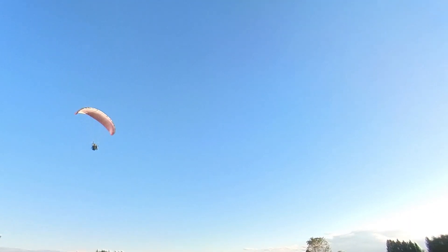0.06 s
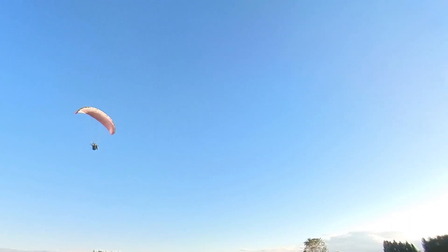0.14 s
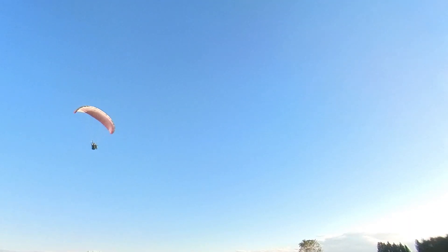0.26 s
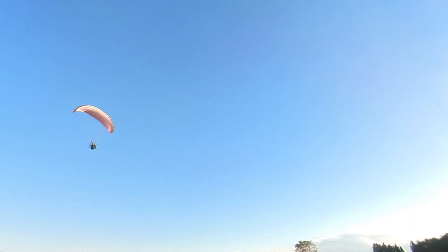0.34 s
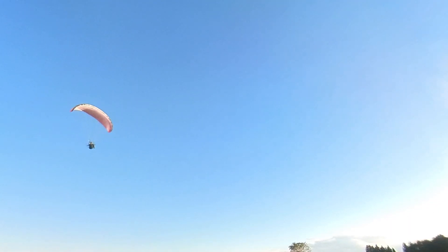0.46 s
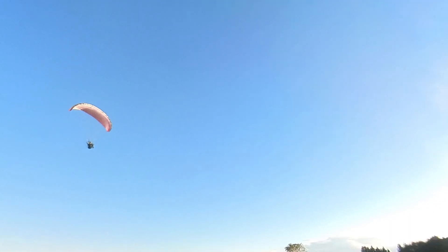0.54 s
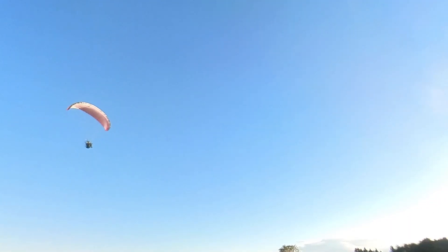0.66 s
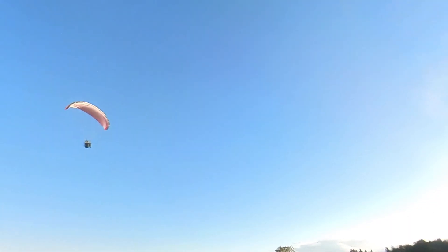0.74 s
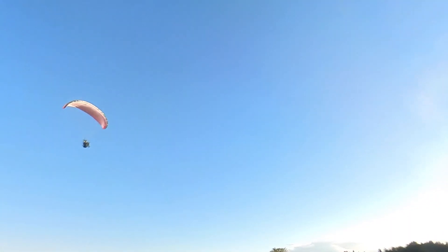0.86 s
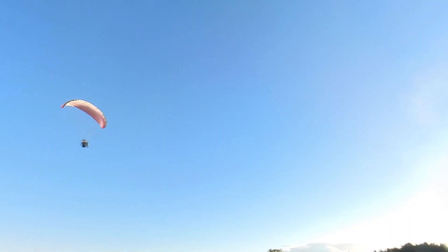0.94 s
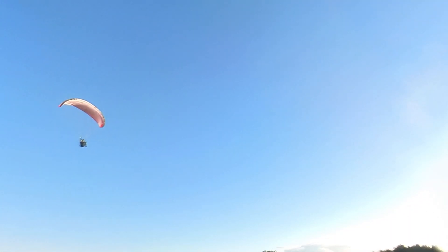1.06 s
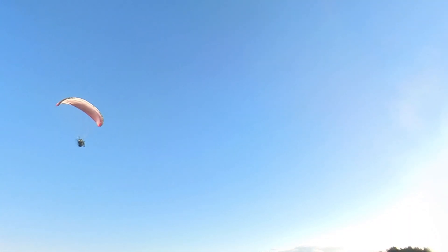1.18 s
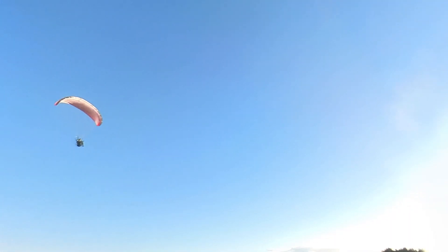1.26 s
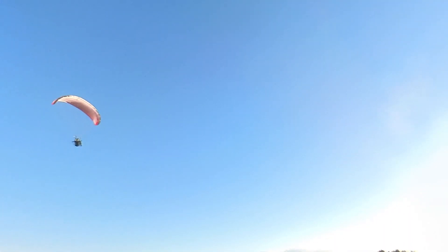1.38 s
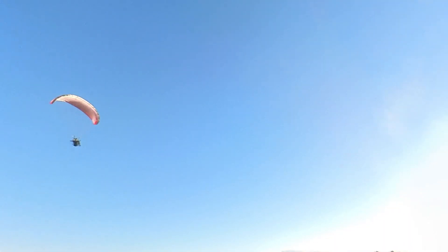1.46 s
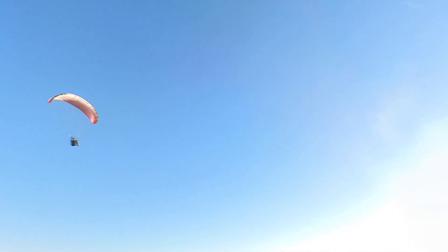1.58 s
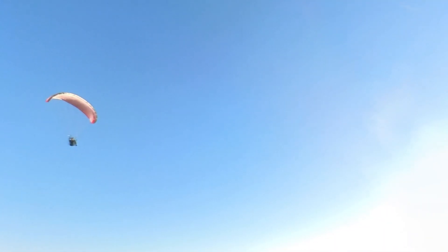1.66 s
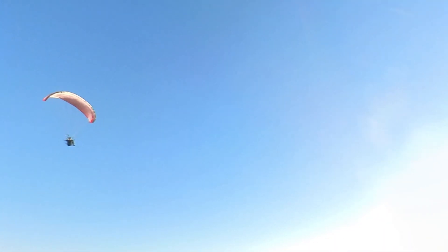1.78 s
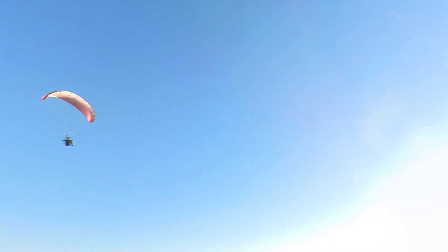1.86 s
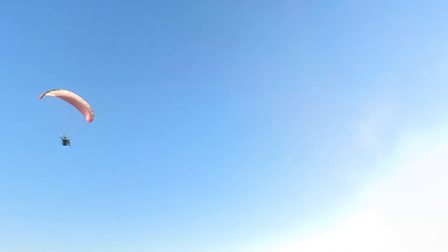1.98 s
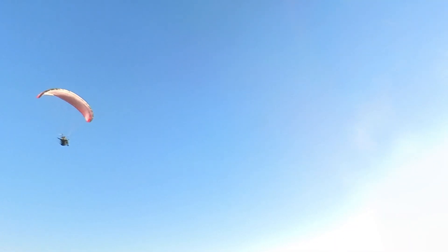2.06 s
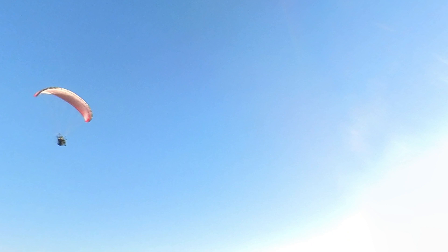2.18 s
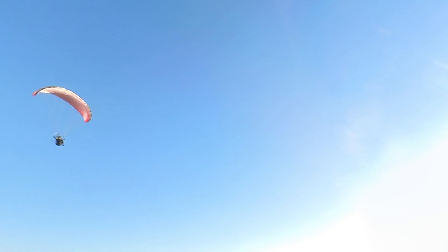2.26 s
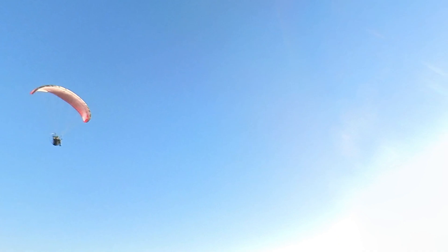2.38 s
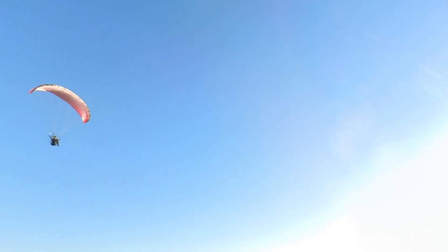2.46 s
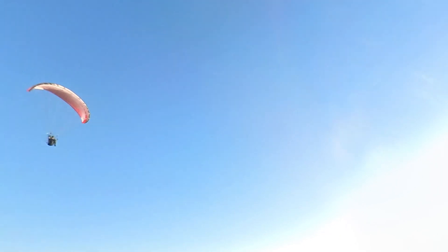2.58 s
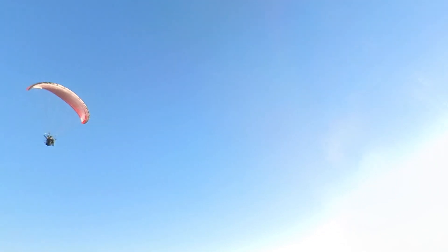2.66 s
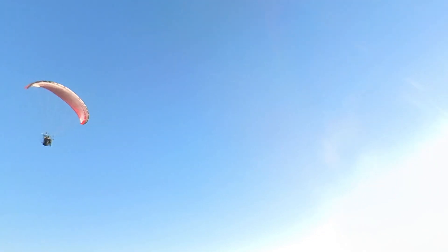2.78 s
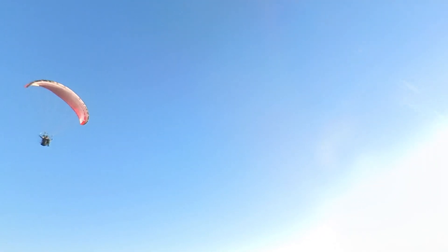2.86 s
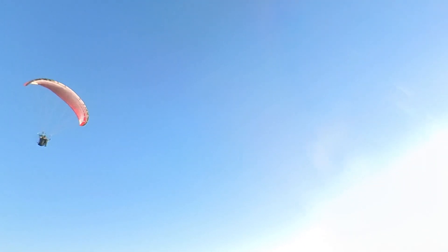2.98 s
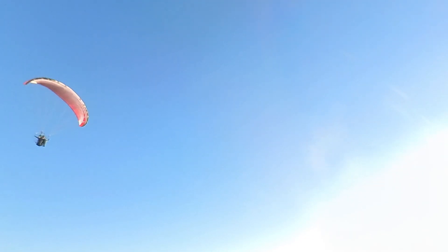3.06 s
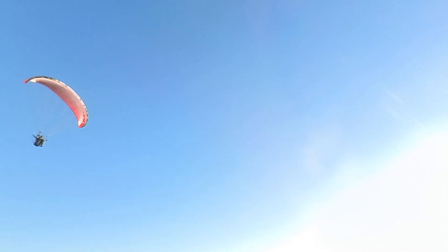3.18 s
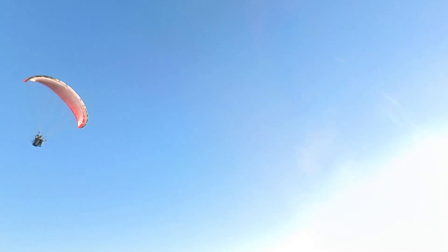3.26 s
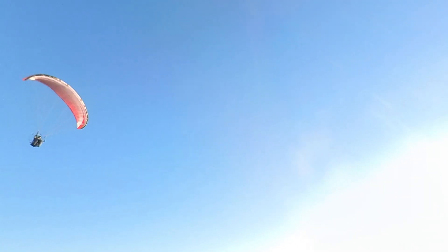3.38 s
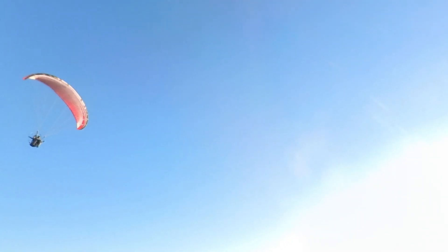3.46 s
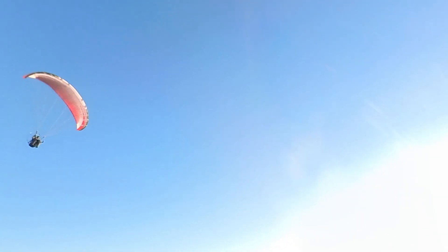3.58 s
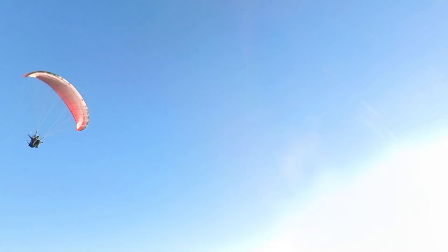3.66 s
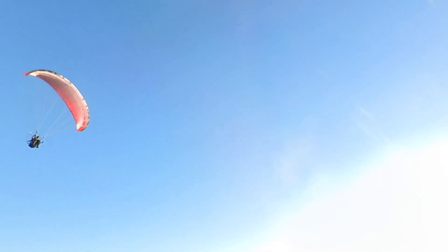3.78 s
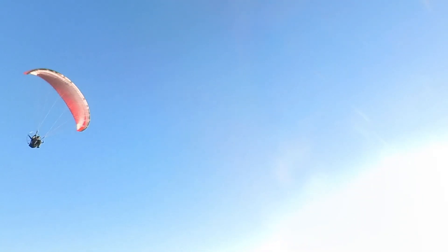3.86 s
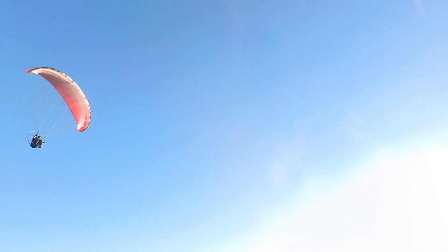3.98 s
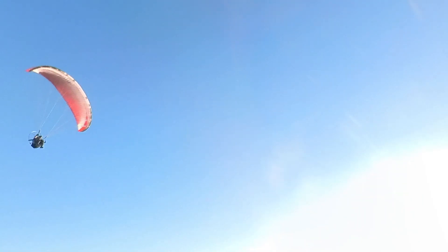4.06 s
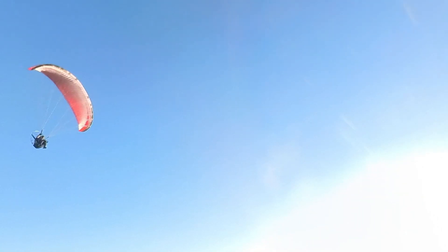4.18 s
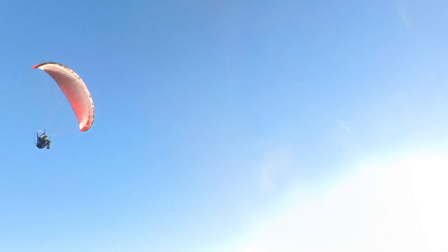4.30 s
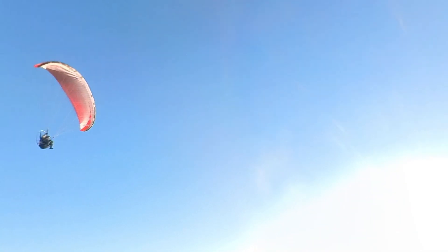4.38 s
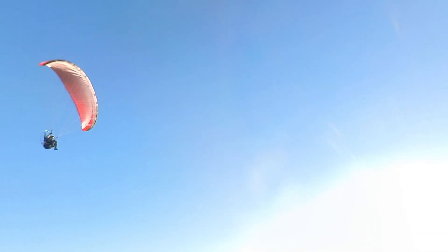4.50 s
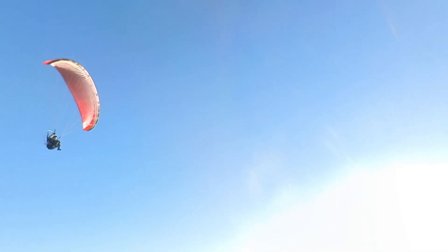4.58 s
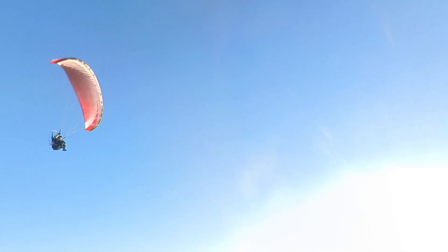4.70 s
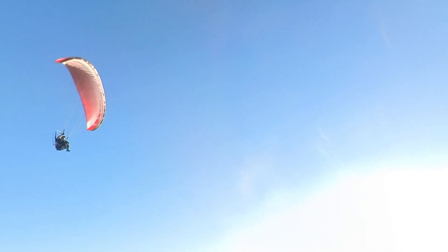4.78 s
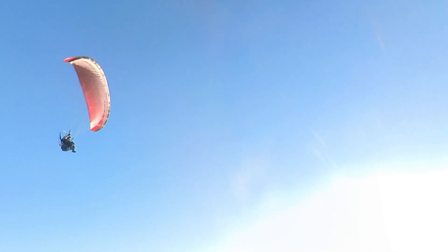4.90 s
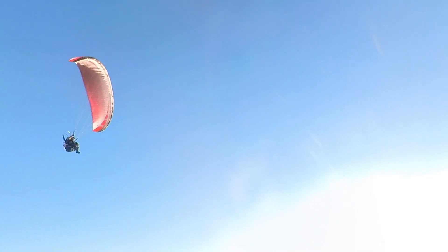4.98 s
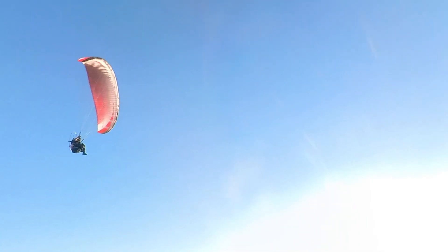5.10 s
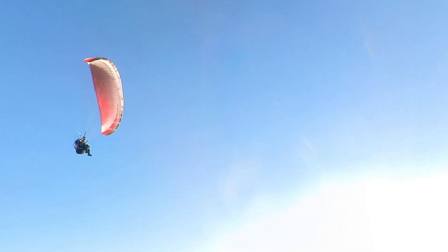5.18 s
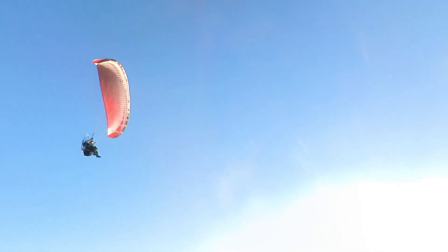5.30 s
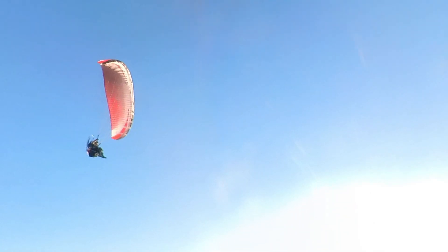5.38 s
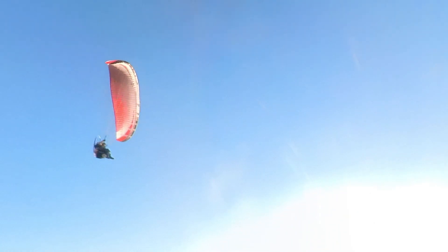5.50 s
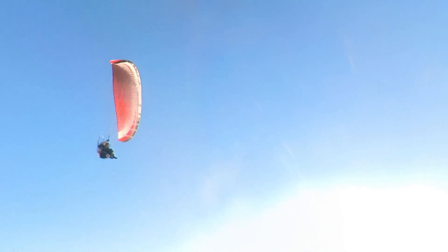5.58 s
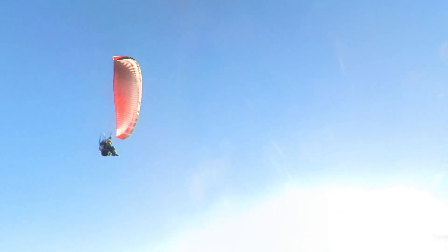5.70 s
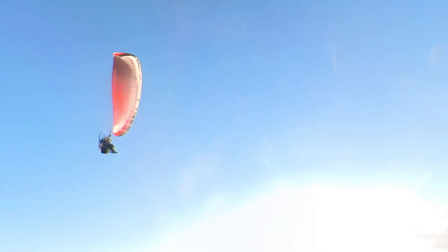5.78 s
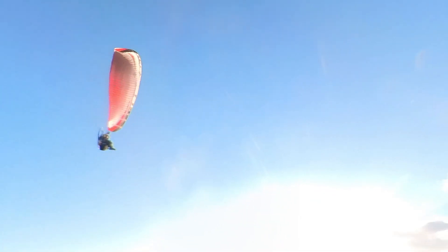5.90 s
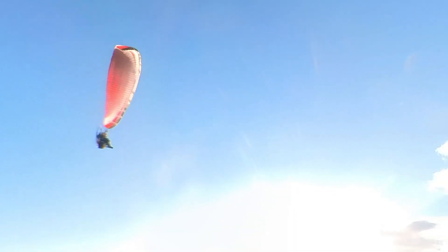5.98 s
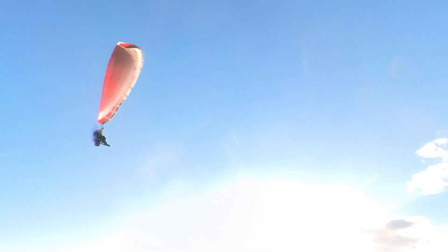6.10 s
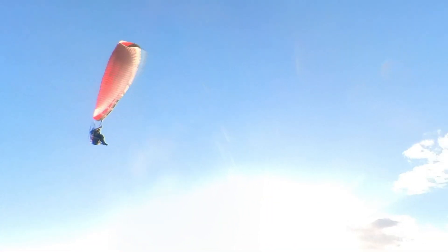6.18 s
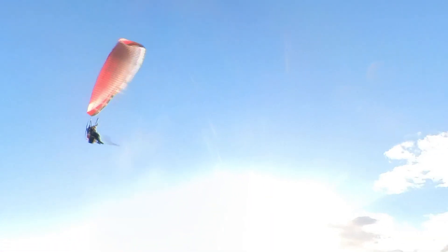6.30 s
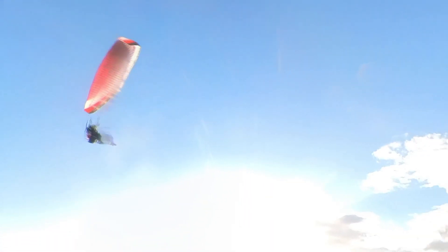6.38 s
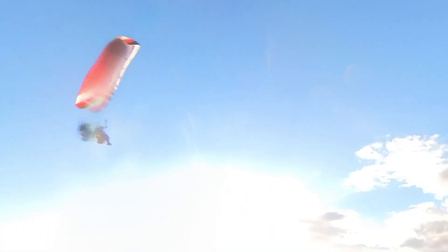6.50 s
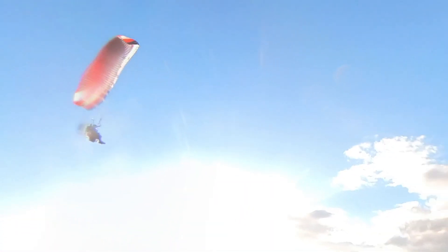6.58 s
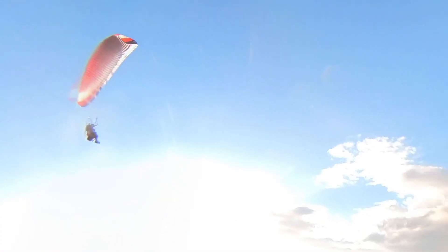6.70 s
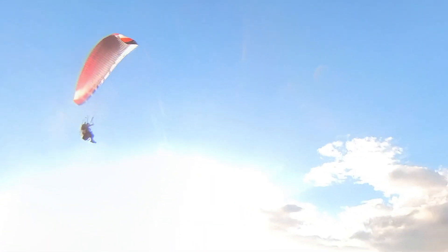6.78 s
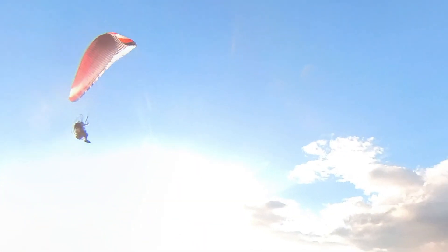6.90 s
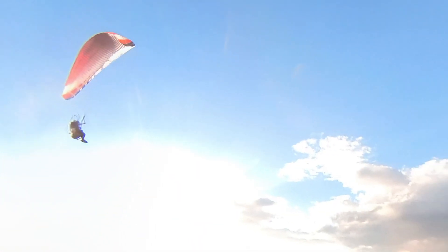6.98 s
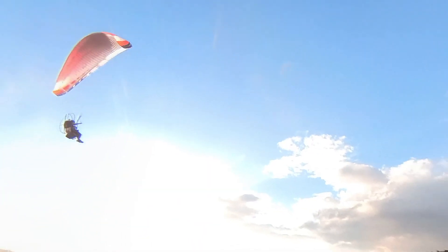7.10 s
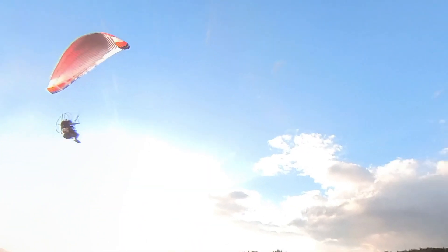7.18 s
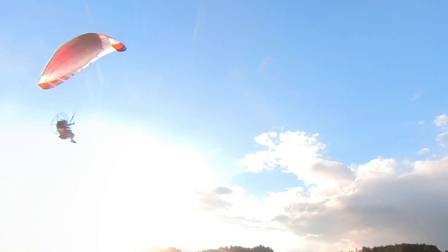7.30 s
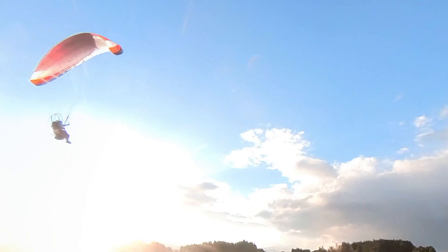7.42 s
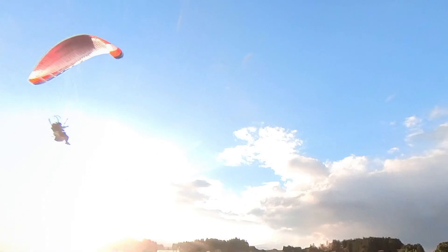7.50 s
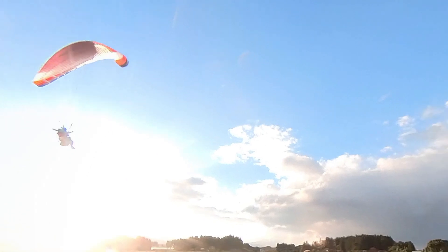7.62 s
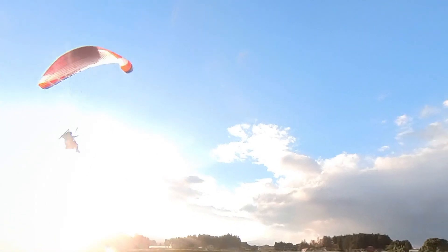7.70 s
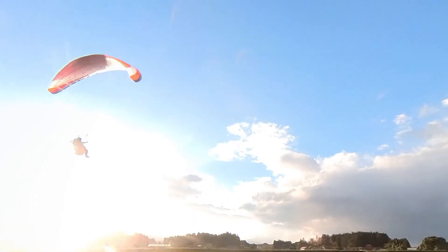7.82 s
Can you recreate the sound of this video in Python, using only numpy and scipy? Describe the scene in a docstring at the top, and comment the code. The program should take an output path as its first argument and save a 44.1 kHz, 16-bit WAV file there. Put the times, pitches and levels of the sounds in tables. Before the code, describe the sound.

A powered paraglider approaches over open fields, its small two-stroke engine firing in sharp, uneven pops at low throttle. A faint hum and propeller whirr lie beneath, and light wind bumps the microphone with low thumps. The popping grows steadily louder as the craft comes overhead, then turns raspier, with more hiss and a thin whine, and dips slightly in pitch as it passes.

```python
"""A paramotor's two-stroke engine pops past overhead at low throttle, above open fields.
It fires only every few turns: sharp exhaust pops, often in pairs, ring the pipe and silencer, each with
a rasp of gas. Under them the crank hums, the casing whines and the propeller whirrs. The craft's sound
bounces off the grass and scatters off the land, and a light wind buffets the microphone."""
import sys
import numpy as np
from scipy import signal
from scipy.fft import rfft, irfft, next_fast_len
from scipy.io import wavfile
from scipy.ndimage import uniform_filter1d, minimum_filter1d

SR = 44100
rng = np.random.default_rng(int(sys.argv[2]) if len(sys.argv) > 2 else 0)


def master(y):
    """Save y as 16-bit WAV."""
    cut = np.clip(np.atleast_2d(y).T, -1, 1)
    pcm = np.round(cut * 32767)  # scale
    wavfile.write(sys.argv[1], SR, pcm.astype(np.int16))


N = 346185
TIME = np.arange(N) / SR
NEAREST_S, NEAREST_M, SPEED_M_PER_S = 6.46, 39, 15.9  # straight, steady pass


def amp(db):
    """Decibels to gain."""
    return 10 ** (np.asarray(db) / 20)


def unit(x):
    """Scales to rms 1."""
    return x / np.sqrt(np.mean(x ** 2) + 1e-20)


def curve(rows, at_s=TIME, column=1):
    """One table column, interpolated in time."""
    table = np.transpose(rows)
    return np.interp(at_s, table[0], table[column])


def colour(spectrum, size):
    """Gain of a spectrum on FFT bins."""
    hz, db = np.transpose(spectrum)
    bins_hz = np.fft.rfftfreq(size, 1 / SR)
    return amp(np.interp(np.log(bins_hz + 1), np.log(hz), db))


def noise(spectrum):
    """Coloured noise, rms 1."""
    size = next_fast_len(N + N % 2, True) * 2
    white = rfft(rng.standard_normal(size))
    return unit(irfft(white * colour(spectrum, size))[:N])


def lowpass(x, hz, order=1):
    """Butterworth roll-off above hz."""
    return signal.sosfilt(signal.butter(order, min(hz, .45 * SR), fs=SR, output="sos"), x)


def band_limit(x, hz):
    """Steep cut above hz."""
    taps = signal.firwin(127, hz, window=("kaiser", 7), fs=SR)
    return signal.oaconvolve(x, taps[None], "same")


def wander(rate_hz):
    """Smooth random drift, rms 1."""
    return unit(lowpass(rng.standard_normal(N), rate_hz, order=2))


def convolve(x, response):
    """Plays x through an impulse response."""
    return signal.oaconvolve(x, response)[:N]


def pulse(spectrum, size=4096):
    """Minimum-phase pulse, peak 1."""
    log_gain = np.log(colour(spectrum, size))
    mirrored = np.concatenate([log_gain, log_gain[-2:0:-1]])
    response = np.exp(np.conj(signal.hilbert(mirrored)))
    wave = np.fft.ifft(response).real[:size // 2]
    return wave / abs(wave).max()


def nearness_db(at_s=TIME):
    """1 / distance law, 0 dB at the nearest point."""
    along_m = SPEED_M_PER_S * (at_s - NEAREST_S)
    return 20 * np.log10(NEAREST_M / np.hypot(NEAREST_M, along_m))


def doppler(at_s=TIME, sound_m_per_s=343):
    """Pitch ratio: above 1 approaching, below 1 leaving."""
    along_m = SPEED_M_PER_S * (at_s - NEAREST_S)
    return 1 / (1 + SPEED_M_PER_S / sound_m_per_s * along_m / np.hypot(NEAREST_M, along_m))


# wind rumble: t/s, level/dB
WIND_LEVEL = [(0, -38), (1.4, -32), (2, -29.5), (2.3, -34.5), (3.2, -32), (3.7, -28), (4.1, -35),
              (4.8, -33), (5.7, -32), (6.2, -42.5), (6.7, -39), (7.3, -30.5), (7.85, -54)]
# wind rumble: f/Hz, level/dB
WIND_SPECTRUM = [(12, -21), (30, -11.5), (55, 2.5), (85, -5.5), (120, -5.5), (200, -10.5), (350, -17),
                 (800, -43), (2000, -75)]
# buffets: t/s, swirl/dB, length/s, centre/Hz, thump/dB
BUFFETS = [(0.014, -28.5, 0.058, 260, -31), (0.685, -30.5, 0.13, 254, -32), (0.828, -29, 0.034, 102, -18),
           (1.128, -32.5, .04, 110, -18), (1.38, -32, 0.063, 91, -16.5), (1.5, -25, 0.043, 74.5, -19),
           (1.764, -25, 0.043, 98.5, -18), (1.953, -20, .13, 111, -13), (2.055, -26, 0.036, 119, -14),
           (2.547, -31, 0.053, 90, -27), (3.276, -26.5, 0.054, 89, -26), (3.462, -22, .04, 110, -8.5),
           (3.606, -21, 0.06, 114, -11.5), (3.811, -27.5, 0.045, 94, -16), (4.333, -28.5, 0.12, 80, -15),
           (4.676, -28, 0.05, 112, -16.5)]


def wind(lump_db=2.0, lump_hz=9, band_ratio=1.34):
    """Lumpy rumble on the microphone; each buffet is a swirl around one suck-and-push thump."""
    out = amp(curve(WIND_LEVEL) + lump_db * wander(lump_hz)) * noise(WIND_SPECTRUM)
    for at_s, swirl_db, length_s, hz, thump_db in BUFFETS:
        near = abs(TIME - at_s) < 2 * length_s
        t = TIME[near] - at_s
        envelope = np.exp(-(2 * t / length_s) ** 2)
        band = signal.butter(2, [hz / band_ratio, hz * band_ratio], "band", fs=SR, output="sos")
        swirl = envelope * signal.sosfilt(band, rng.standard_normal(len(t)))
        swirl *= np.linalg.norm(envelope) / np.linalg.norm(swirl)
        phase = 2 * np.pi * hz * t
        thump = phase * np.exp((1 - phase ** 2) / 2)
        out[near] += amp(swirl_db) * swirl + amp(thump_db) * thump
    return out


def field_scatter(x, t60_s=0.89, onset_s=0.033, cutoff_hz=2500, level_db=-15.5, far_slope=1.22, paths=5):
    """Scatter off the land: paths crossfade as the craft moves; its share grows with distance."""
    t, out = TIME[:SR // 2], np.zeros(N)
    envelope = amp(-60 * t / t60_s) * np.clip(t / onset_s - .5, 0, 1)
    position = TIME / TIME[-1] * (paths - 1)
    for k in range(paths):
        tail = lowpass(rng.standard_normal(len(t)) * envelope, cutoff_hz)
        tail *= np.sqrt(np.pi * cutoff_hz / SR) / np.linalg.norm(tail)
        crossfade = np.cos(np.pi / 2 * np.clip(position - k, -1, 1))
        out += convolve(x * crossfade, tail)
    return amp(level_db - far_slope * nearness_db()) * out


# ground bounce, longest overhead: t/s, lag/ms
BOUNCE_LAG = [(0, 2.51), (1, 2.81), (2.4, 3.15), (3.9, 3.26), (4.6, 3.47), (5.4, 3.88), (6.1, 3.99),
              (7, 3.59), (7.85, 2.88)]


def ground_bounce(x, gain=0.72, grass_hz=2800):
    """Direct sound plus a duller bounce off the grass: a sweeping comb."""
    lag_s = curve(BOUNCE_LAG) / 1000
    dull = lowpass(x, grass_hz, order=2)
    return x + gain * np.interp(TIME - lag_s, TIME, dull, left=0)


# treble notch, deepest for sound from the front: t/s, depth/0-1
NOTCH_DEPTH = [(0, 0.85), (1.5, 0.66), (3, 0.36), (5.3, 0.5), (6.4, 0.14), (7.85, 0)]


def body_notch(x, centre_hz=5780, width_hz=680):
    """The camera body cancels a narrow treble band, depending on direction."""
    band = signal.lfilter(*signal.iirpeak(centre_hz, centre_hz / width_hz, fs=SR), x)
    return x - curve(NOTCH_DEPTH) * band


# craft's output, front to rear: t/s, hiss/dB, rasp trim/dB, propeller rush/dB, crank fundamental/dB
CRAFT_LEVELS = [(0, -69, -36, -44, -48), (.55, -74, -27, -44, -37), (.65, -81.5, -25.5, -43.5, -40.5),
                (2, -76.5, -25, -43.5, -44), (3.5, -74.5, -25, -42.5, -45.5), (5, -61, -22, -38, -44.5),
                (6.2, -52.5, -27, -34.5, -55), (7.1, -46.5, -17.5, -34.5, -41),
                (7.85, -49.5, -15.5, -35, -43)]
# propeller rush: f/Hz, level/dB
RUSH_SPECTRUM = [(60, -5.5), (250, 11.5), (420, 4.5), (680, -5.5), (1000, -10), (1400, -10), (2000, -18),
                 (2700, -16.5), (3500, -18), (5500, -23.5), (7000, -32.5), (9000, -64)]


def propeller(turns, chop_depth=0.31, gear_ratio=.72):
    """Geared-down blades chop an air rush and a hiss heard mostly from behind."""
    blades = unit(1 + chop_depth * np.cos(2 * np.pi * gear_ratio * turns))
    rush = amp(curve(CRAFT_LEVELS, column=3)) * noise(RUSH_SPECTRUM)
    hiss = amp(curve(CRAFT_LEVELS, column=1)) * noise(HISS_SPECTRUM)
    return blades * (rush + hiss)


# crank overtones: harmonic number, level/dB
OVERTONES = [(3, -5.5), (5, -3), (8, -6), (11, -6), (15, -10.5), (18, -11.5)]
# all overtones: t/s, level/dB
OVERTONE_LEVEL = [(0, -46), (1.5, -55), (3, -47.5), (5, -65.5), (6.5, -48), (7.85, -48.5)]


def crank_hum(turns, lag_turns=0.5983):
    """The crank's fundamental and overtones, trailing the pops by part of a turn."""
    phase = 2 * np.pi * (turns - lag_turns)
    fundamental = amp(curve(CRAFT_LEVELS, column=4)) * np.cos(phase)
    overtones = sum(amp(db) * np.cos(harmonic * phase) for harmonic, db in OVERTONES)
    return fundamental + amp(curve(OVERTONE_LEVEL)) * overtones


# casing ring, strongest from behind: t/s, level/dB
CASING_LEVEL = [(0, -77.5), (3.5, -85), (4.6, -63.5), (5.6, -58), (6.4, -55.5), (7.05, -48.5), (7.4, -52.5),
                (7.85, -51)]


def casing_whine(gas, ring_hz=3530, waver_hz=48, decay_s=0.038, flare_share=0.57, rough_db=4.5):
    """The casing's thin, wavering ring flares after each firing and sinks with the Doppler shift."""
    hz = ring_hz * doppler() + waver_hz * wander(rate_hz=60)
    tone = np.sin(2 * np.pi * np.cumsum(hz) / SR)
    flare = abs(convolve(gas ** 2, np.exp(-TIME[:SR // 4] / decay_s)))
    flare /= uniform_filter1d(flare, SR // 2) + 1e-12
    envelope = np.sqrt(1 - flare_share + flare_share * flare) * amp(rough_db * wander(rate_hz=90))
    return amp(curve(CASING_LEVEL)) * unit(tone * envelope)


# sharp ticks near the closest point: t/s, level/dB
SHARP_TICKS = [(5.2372, -52), (5.3714, -45), (6.2903, -52), (6.9403, -53), (7.1595, -35)]
# tick: f/Hz, level/dB
TICK_SPECTRUM = [(2000, -17), (6000, 8), (9000, 2.5), (12000, -5), (15500, -16)]


def ticks(decay_s=0.0028, faint_db=-54):
    """Thin, bright ticks: a faint one growing with each firing's strength, and a few sharp ones."""
    t, envelope = TIME[:SR // 30], np.zeros(N + SR)
    faint = [(at_s, faint_db + 2 * pop_db) for at_s, pop_db, _, _ in FIRINGS]
    for at_s, db in faint + list(SHARP_TICKS):
        start = round(at_s * SR)
        envelope[start:start + len(t)] += amp(db) * np.exp(-t / decay_s)
    return envelope[:N] * noise(TICK_SPECTRUM) / 2


# silencer shell: f/Hz, level/dB
CLANK_SPECTRUM = [(500, -13.5), (900, 0), (1250, 1.5), (1500, -4.5), (1850, -8.5), (2400, -22), (5000, -29)]


def shell_clank(kicks, swell_s=0.0015, level_db=-27.0, far_slope=0.33):
    """The silencer's thin shell shakes after each pop: a tinny noise burst."""
    age = TIME[:SR // 12] / swell_s
    power = convolve(kicks ** 2, age ** 2 * np.exp(-age))
    return amp(level_db - far_slope * nearness_db()) * np.sqrt(abs(power)) * noise(CLANK_SPECTRUM)


# cooling fin modes: f/Hz, gain/dB
FIN_MODES = [(2420, 0.5), (4400, -2.5), (4800, -3.5), (5350, -0.5), (6150, 3.5), (6600, -5.5), (7200, 2.5)]


def fin_ring(rasp, width_hz=70):
    """The rasp plus the Doppler-shifted ringing it excites in the cooling fins."""
    source_s = np.cumsum(doppler()) / SR
    out = rasp.copy()
    for hz, db in FIN_MODES:
        carrier = np.exp(2j * np.pi * hz * source_s)
        baseband = lowpass(rasp / carrier, width_hz / 2)
        out += amp(db) * 2 * (carrier * baseband).real
    return out


# gas rasp and propeller hiss: f/Hz, level/dB
HISS_SPECTRUM = [(400, 10), (1300, 9), (2000, -3), (3000, 0.5), (4200, 1.5), (5300, 4.5), (6500, 3.5),
                 (7500, -2), (9000, -10)]


def gas_rasp(gas, rise_s=0.0013, decay_s=0.0068, spit_s=0.00034, spit_db=2, spit_slope=.5,
             level_db=-9.0, spread_db=2.64):
    """Each pop opens with a spit, softened by distance, then swells into turbulent hiss and dies."""
    t = TIME[:SR // 6]
    jets = gas * amp(spread_db * rng.standard_normal(N))
    spits = jets * amp(spit_db + spit_slope * nearness_db())
    power = convolve(jets ** 2, np.exp(-t / decay_s) * (1 - np.exp(-t / rise_s)))
    power += convolve(spits ** 2, np.exp(-t / spit_s))
    return amp(curve(CRAFT_LEVELS, column=2) + level_db) * np.sqrt(abs(power)) * noise(HISS_SPECTRUM)


# bark of a well-filled charge: f/Hz, level/dB
BARK_SPECTRUM = [(300, -4), (900, -2), (1500, -3.5), (2500, -4), (4200, -6.5), (7000, -27)]


def bark(kicks, level_db=-15.5, steepening=2, distance_exponent=0.15):
    """The hardest firings leave the pipe with a steeper, brighter front, which distance weakens."""
    local_peak = -minimum_filter1d(-kicks, SR // 2) + 1e-9
    front = (kicks / local_peak) ** steepening * (local_peak / local_peak.max()) ** distance_exponent
    return amp(level_db) * convolve(kicks * front, pulse(BARK_SPECTRUM))


def recoil(x, corner_hz=110):
    """All-pass: a suck back into the pipe follows each push of gas."""
    return x - 2 * lowpass(x, corner_hz)


# one pop from the pipe: f/Hz, level/dB
PIPE_SPECTRUM = [(35, -21.5), (85, -1), (130, -3.5), (220, 4.5), (280, -1), (335, -14), (420, -7.5),
                 (620, -8.5), (810, -7), (1000, -20), (1250, -20.5), (1500, -27), (1950, -39),
                 (4000, -55.5)]
# silencer modes: f/Hz, level/dB re pop peak, t60/s
SILENCER_MODES = [(260, -38.5, 0.063), (461.6, -32.5, 0.2), (626, -17, 0.066), (857.6, -39.5, 0.2),
                  (1153, -35.5, 0.094), (1368, -37.5, .07)]
# tone as the exhaust's aim changes: t/s, bass/dB, brightness/dB
EXHAUST_AIM = [(0, 2.5, 2), (1.96, -6, -0.5), (3.92, -5, 2.5), (5.877, -1, -3), (6.8, -3, -1.5),
               (7.85, 2, 6)]


def exhaust(kicks, level_db=-1.5):
    """Each kick sounds the pipe and silencer; both sink with the Doppler shift."""
    t, out = TIME[:SR // 6], np.zeros(N)
    stages_s = [row[0] for row in EXHAUST_AIM]
    tilt_hz = [90, 300, 620, 820, 1100, 1600]
    for (at_s, bass_db, bright_db), crossfade in zip(EXHAUST_AIM, np.eye(len(EXHAUST_AIM))):
        stage_kicks = kicks * np.interp(TIME, stages_s, crossfade)
        shift = doppler(at_s)
        tilt_db = [bass_db, 0, 0, -bright_db, 0, bright_db]  # trades honk for upper mids
        pop = pulse([(hz * shift, db + np.interp(hz, tilt_hz, tilt_db)) for hz, db in PIPE_SPECTRUM])
        ring = sum(amp(db - 60 * t / t60_s) * np.sin(2 * np.pi * hz * shift * t)
                   for hz, db, t60_s in SILENCER_MODES)
        out += convolve(stage_kicks, pop) + convolve(stage_kicks, ring)
    return amp(level_db) * out


# nominal crank turn as heard: t/s, period/ms
TURN_PERIOD = [(0, 12.3), (.6, 12.3), (1.6, 12.1), (2.8, 12.1), (3.4, 12.4), (4.4, 12.55), (4.9, 12.73),
               (6.4, 12.8), (7.1, 12.9), (7.85, 12.6)]
# weak puffs between firings: t/s, level/dB
PUFF_LEVEL = [(0, -24.5), (.55, -27), (.92, -25), (1.05, -35), (2, -41.5), (3.5, -49.5), (5, -30.5),
              (6.2, -39), (7.1, -34), (7.85, -28.5)]
# firings: t/s, pop/dB, after-pop one turn later/dB, extra gas/dB
FIRINGS = [(0.0118, -20, -19, 3.5), (0.2341, -17.5, -27.5, -4), (0.2833, -13.5, -28, 2.0),
           (0.58, -18.5, -27, 4.5), (0.6298, -15.5, -28.5, 3.5), (0.678, -26.5, -18, 5.5),
           (0.7257, -25, -19.5, 5.5), (0.8129, -21.5, -19, 1.5), (0.9847, -18.5, -22, 4),
           (1.0336, -19.0, -21, -0.5), (1.0826, -17.5, -21.5, -2.5), (1.1316, -20, -21, 0.0),
           (1.1811, -24, -18.5, 2), (1.2293, -18, -20, 3), (1.278, -18, -20.5, 5),
           (1.327, -23.5, -17.5, -0.5), (1.3753, -19, -20, 4), (1.424, -23.5, -17.5, 1.0),
           (1.4725, -18, -19.5, 4.5), (1.5211, -30, -18.5, -3.0), (1.5694, -17, -19.5, -1),
           (1.6295, -16, -20, -0.5), (1.7015, -19.5, -19.0, -2.5), (1.75, -20.0, -18, -0.5),
           (1.8097, -14, -26, 4.5), (1.8578, -14, -32, 3.5), (1.9065, -18.5, -19, -2),
           (1.9545, -21, -16.5, 0.0), (2.0025, -14.5, -18.5, 1.0), (2.0625, -14.0, -19.5, 0),
           (2.1107, -17.5, -21.5, -1.5), (2.1602, -25, -19, 4), (2.2077, -16.5, -19.5, 3),
           (2.2552, -16, -20, 2), (2.3161, -18, -17, 2), (2.3643, -18.5, -19.5, -3.5),
           (2.4122, -15, -18.5, 2.5), (2.4727, -13, -21.5, -2), (2.5204, -20.0, -18.5, 1.5),
           (2.5807, -12.5, -26.5, 4), (2.6298, -22.5, -18, 1.5), (2.6897, -14, -27, 3),
           (2.7377, -23.5, -14.0, 0.0), (2.786, -17.5, -18, 1), (2.8336, -19.5, -17.5, 1.5),
           (2.8821, -16, -18.5, 2.5), (2.9427, -18, -17, 5.5), (2.9906, -14.0, -18, 1.5),
           (3.0509, -12.5, -23.5, 0.5), (3.1104, -15.0, -39, -0.5), (3.1589, -17, -20, -3),
           (3.2075, -26, -15.5, -2), (3.2557, -16, -19, -1.5), (3.3166, -12.5, -21.5, 2.5),
           (3.378, -11.0, -34.5, 2), (3.4278, -20.0, -16.5, -7), (3.4898, -15, -18.5, -1),
           (3.5517, -15, -16, 0.0), (3.6135, -13.5, -19.5, 1.5), (3.6754, -12.5, -19, 2),
           (3.7365, -9, -22.5, -1), (3.811, -13, -30, 1.5), (3.848, -25.5, -18, 3),
           (3.9095, -14.5, -18, -1.0), (3.9704, -10.5, -19.5, 5), (4.0455, -15, -17.0, 0.5),
           (4.1082, -20, -14, -4), (4.1707, -22, -13.0, -2.5), (4.2333, -9.5, -16.5, 1.5),
           (4.3084, -7.0, -34, 1), (4.3598, -16.0, -12.0, -1), (4.4228, -21.0, -12.0, -5.5),
           (4.4986, -12.5, -13, -0.5), (4.574, -8, -24.5, -1), (4.6255, -12.5, -13, -0.5),
           (4.7029, -12, -12.5, 1), (4.7787, -8.5, -15, 2.5), (4.8679, -11, -12.0, -0.5),
           (4.9439, -7, -12.0, -2.5), (5.0211, -4.5, -34, -0.5), (5.0739, -17.0, -9, -1),
           (5.1524, -10, -12.5, -1.0), (5.2286, -5.5, -38, 0), (5.3065, -7, -26, -0.5),
           (5.357, -17, -10.0, 1.5), (5.4205, -8, -11.5, -2.5), (5.4962, -9.0, -10, -1),
           (5.5852, -7.5, -40, 1), (5.6494, -13, -8.5, 0), (5.7256, -7.0, -10.0, -0.5),
           (5.8015, -8, -10, 1), (5.878, -9.5, -8.5, -2.5), (5.968, -5.5, -39, -1.0),
           (6.0187, -22, -8, 5.5), (6.0958, -5.5, -30, -1), (6.1476, -12.5, -7.5, 0),
           (6.2103, -4, -10.5, 4), (6.286, -4.5, -11, 0.5), (6.3491, -9.0, -10, 0), (6.426, -5.5, -16.5, 3),
           (6.4898, -5.5, -12, 0), (6.5534, -17, -6.5, -5), (6.6166, -5.5, -12, 0.5),
           (6.6928, -4, -11, 0.5), (6.7703, -4.0, -27.5, -2.5), (6.823, -5.5, -31.5, -1.5),
           (6.8754, -6, -13.5, -1.5), (6.9523, -4.5, -19, -0.5), (7.0178, -7.5, -11, 1.5),
           (7.095, -6.5, -25.5, 2.5), (7.1584, -7, -22, 2), (7.2107, -14, -14, -6.5),
           (7.2756, -5.5, -11.5, -1.5), (7.3529, -9, -9.5, -3), (7.4305, -7.0, -10, 0),
           (7.5076, -7.5, -25, 1.0), (7.5458, -10.5, -10, -1), (7.6096, -11.5, -9.5, -4.5),
           (7.6728, -6.0, -13, 1.5), (7.7493, -10.5, -13, 0), (7.8121, -6.0, -17.5, 0)]


def crank(surge=0.024, wobble=.007, puff_spread_db=4.5, jitter_s=0.00025, charge_db=-3.5, evenness=0.15):
    """One kick a turn: pop, after-pop, then puffs. Returns kicks, gas per kick and the turn count."""
    kicks, gas, turn_samples = np.zeros(N + SR), np.zeros(N + SR), []
    ends_s = [row[0] for row in FIRINGS[1:]] + [FIRINGS[-1][0] + .1]
    for (start_s, pop_db, after_db, gas_db), end_s in zip(FIRINGS, ends_s):
        gap_s = end_s - start_s
        count = max(round(1000 * gap_s / curve(TURN_PERIOD, start_s)), 2)
        uneven, stray, late = rng.standard_normal((3, count))
        late[:2] = 0  # jitter on puffs only
        puff_db = curve(PUFF_LEVEL, start_s + gap_s * np.arange(count) / count)
        strength = amp(puff_db + puff_spread_db * uneven)
        strength[:2] = amp([pop_db, after_db])
        periods = 1 - surge * strength / strength.max() + wobble * stray  # firing hurries the crank
        due = (start_s + gap_s * (np.cumsum(periods) - periods) / periods.sum()) * SR
        at = np.round(due + jitter_s * SR * late).astype(int)
        kicks[at] = gas[at] = strength
        # firings differ less in gas than in loudness
        full_charge = amp(charge_db + nearness_db(start_s))
        gas[at[:2]] = amp(gas_db) * strength[:2] ** (1 - evenness) * full_charge ** evenness
        turn_samples.extend(due)
    turns = np.interp(np.arange(N), turn_samples, np.arange(len(turn_samples)))
    return kicks[:N], gas[:N], turns


def scene():
    """The craft, heard directly, off the ground and off the fields, with wind."""
    kicks, gas, turns = crank()
    pops = recoil(exhaust(kicks) + bark(kicks))
    engine = pops + fin_ring(gas_rasp(gas)) + shell_clank(kicks) + crank_hum(turns) + casing_whine(gas)
    craft = ground_bounce(engine + propeller(turns))
    return (body_notch(craft + field_scatter(craft)) + wind())[None]


def record(dry, ceiling=0.46, low_hz=14, high_hz=7600, edge_hz=9200, tick_edge_hz=15800):
    """The microphone rounds tall peaks and loses both extremes; only the ticks reach above its range."""
    rounded = dry / (1 + (dry / ceiling) ** 4) ** (1 / 4)
    dull = lowpass(rounded - lowpass(rounded, low_hz), high_hz, order=6)
    return band_limit(band_limit(dull, edge_hz) + ticks(), tick_edge_hz)


dry = scene()
out = record(dry)
master(out)
```